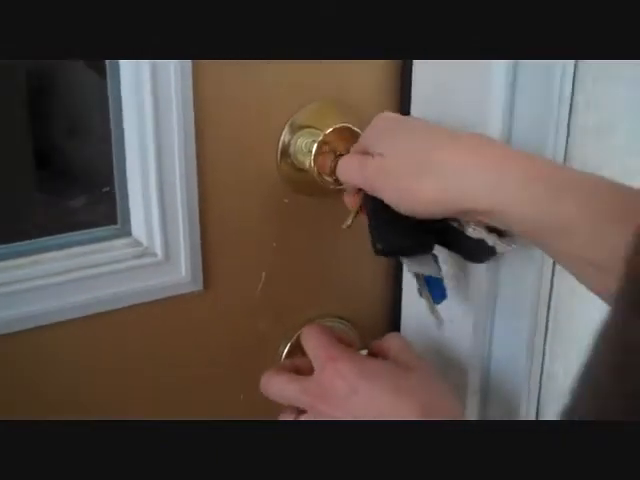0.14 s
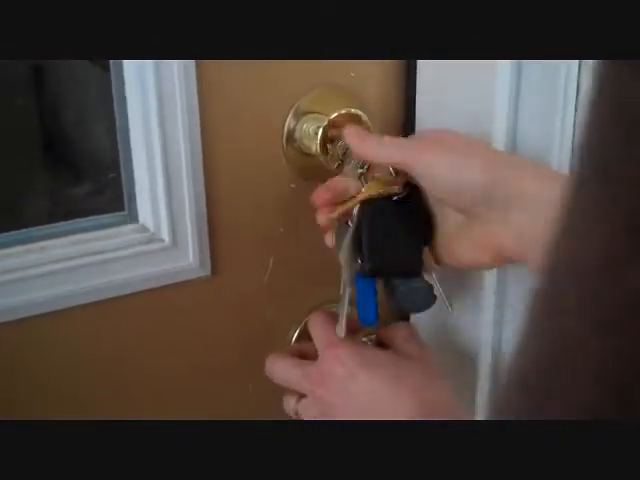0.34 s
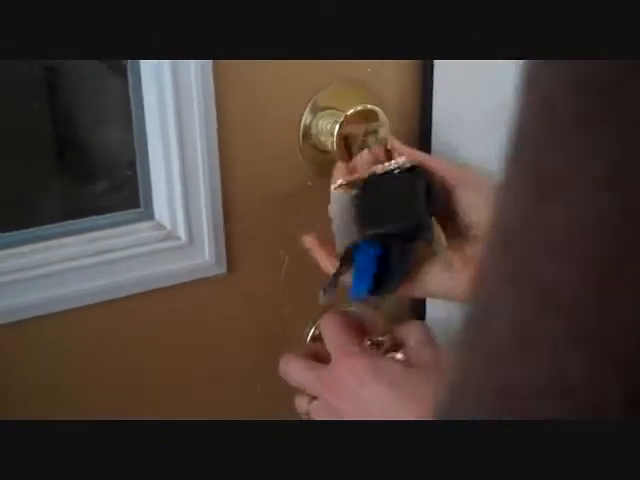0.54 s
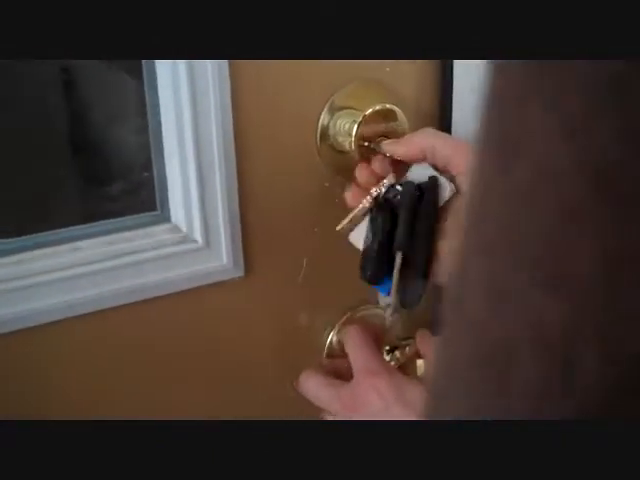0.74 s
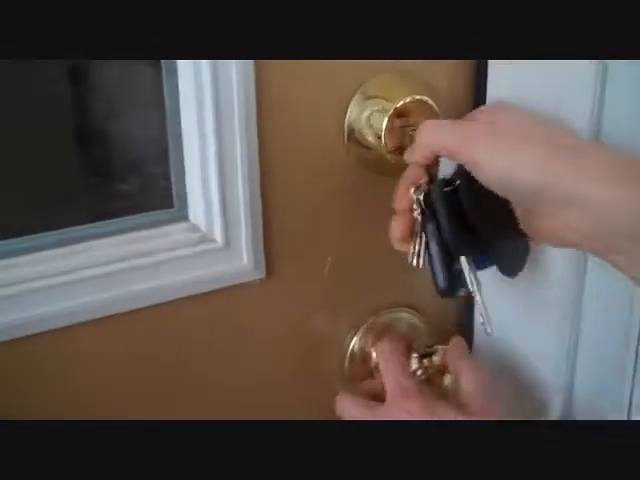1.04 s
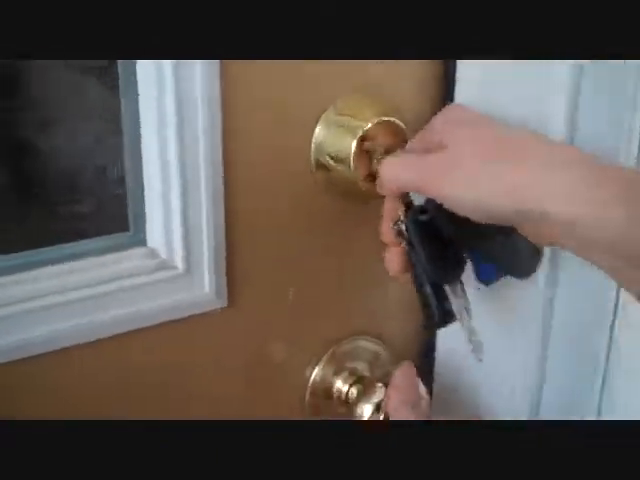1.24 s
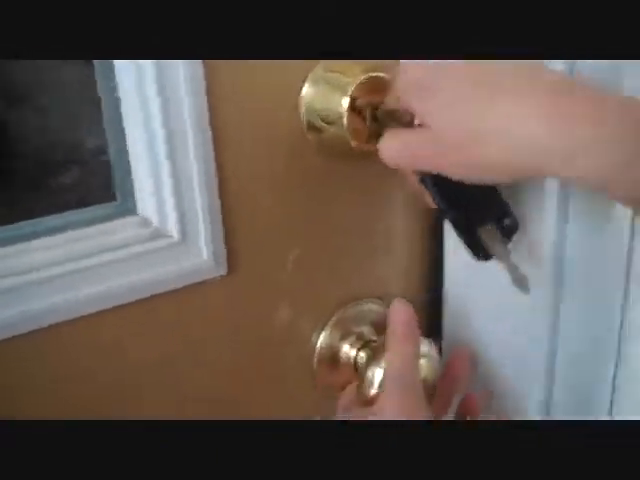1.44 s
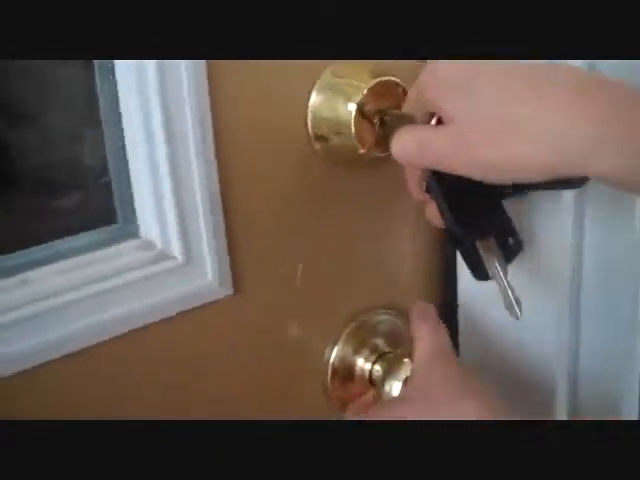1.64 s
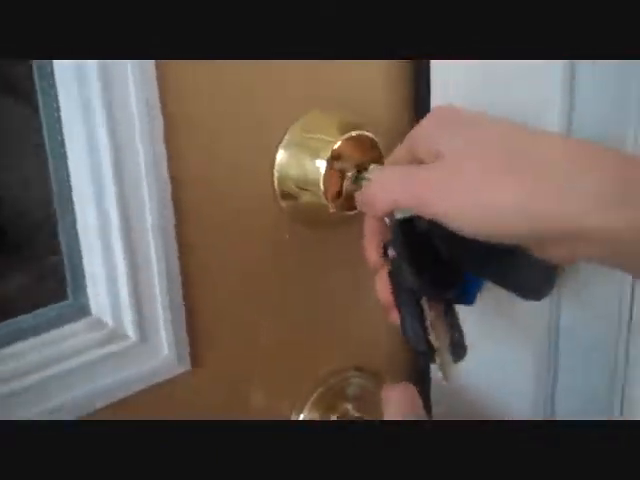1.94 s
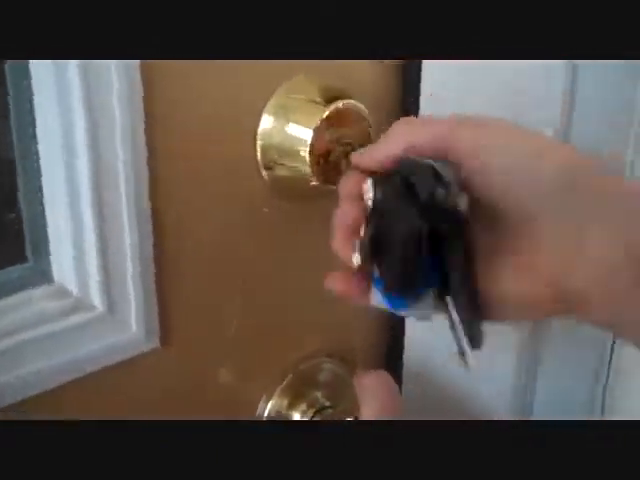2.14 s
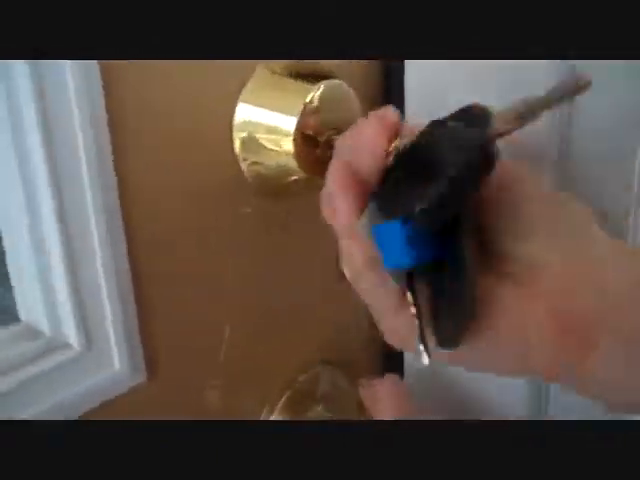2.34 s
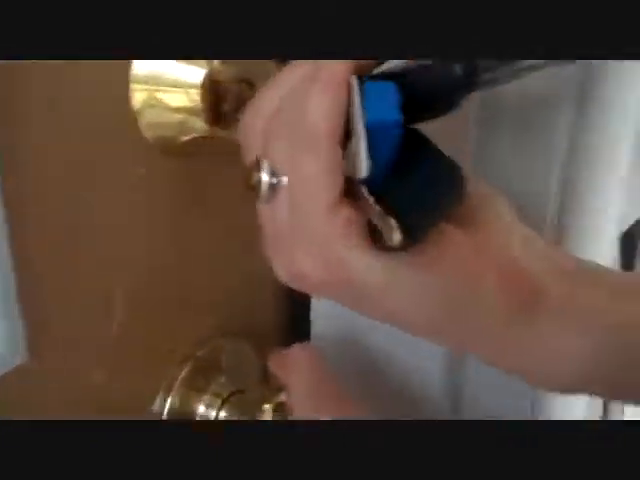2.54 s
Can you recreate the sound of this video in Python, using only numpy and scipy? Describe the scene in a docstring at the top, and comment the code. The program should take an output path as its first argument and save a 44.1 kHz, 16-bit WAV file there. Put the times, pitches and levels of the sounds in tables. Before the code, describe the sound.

Keys jingle and clatter as one turns in a deadbolt, the bolt knocking a wooden door

```python
"""Keys turning in a deadbolt

A bunch of keys and fobs clatters in gritty, ringing bursts as a key turns; the bolt shoots with a knock that rings
the wooden door. The key is drawn out and the bunch rustles in the hand, made of dense tiny clicks. Behind them are
a street drone of noise bands, two wavering engine hums and low wind noise. Two small microphone ports, each with
a sharp treble resonance of its own, overload on the hardest blows."""
import sys
import numpy as np
from scipy import signal
from scipy.io import wavfile

SR = 44100
rng = np.random.default_rng(int(sys.argv[2]) if len(sys.argv) > 2 else 0)


def ratio_of_db(decibels):
    """Turn decibels (scalar or array-like) into linear amplitude factors; 0 dB maps to 1."""
    return 10 ** (np.asarray(decibels, float) / 20)


def persist_wave(psi):
    """Save psi, clipped to +-1, as 16-bit WAV."""
    counts = np.round(np.clip(psi, -1, 1) * 32767).astype(np.int16)
    wavfile.write(sys.argv[1], SR, np.atleast_2d(counts).T)


N = 119070   # length in samples, 2.7 s


def rms_one(x):
    """Scale to unit rms."""
    return x / np.sqrt(np.mean(x ** 2) + 1e-20)


def in_time(rows):
    """Draw each column after the first as a line over the whole scene; the first holds the seconds."""
    s, *columns = np.transpose(rows)
    return [np.interp(np.arange(N) / SR, s, column) for column in columns]


def at_hz(points, hz):
    """Read a curve over pitch, on a log pitch axis."""
    point_hz, values = np.transpose(points)
    return np.interp(np.log(hz), np.log(point_hz), values)


def drift(rate_hz):
    """Slow random wander of unit rms: noise smoothed at one value per 40 samples, then joined by lines."""
    r = np.exp(-80 * np.pi * rate_hz / SR)
    slow = signal.lfilter([1], [1, -2 * r, r * r], rng.standard_normal(N // 40 + 2002))
    slow = slow[2000:]   # leave out the filter's start
    return np.interp(np.arange(N) / 40, np.arange(len(slow)), rms_one(slow))


def ring(clicks, hz, t60_s):
    """A unit click sets off a sine of starting height 1 that dies by 60 dB in t60_s."""
    r, w = ratio_of_db(-60 / (t60_s * SR)), 2 * np.pi * hz / SR
    return signal.lfilter([0, np.sin(w)], [1, -2 * r * np.cos(w), r * r], clicks + 1e-18)


def resonance(x, hz, width_hz):
    """Pass a narrow band, with unit gain at its top."""
    r = np.exp(-np.pi * width_hz / SR)
    feedback = [1, -2 * r * np.cos(2 * np.pi * hz / SR), r * r]
    return signal.lfilter([(1 - r * r) / 2, 0, (r * r - 1) / 2], feedback, x)


def band(x, low_hz, high_hz):
    """Keep what lies between two pitches."""
    return signal.sosfilt(signal.butter(2, [low_hz, high_hz], "band", fs=SR, output="sos"), x)


def grains(size, rate, spread_db):
    """Sparse clicks of uneven size and random sign, about rate of them per second."""
    sizes = ratio_of_db(spread_db * (np.minimum(rng.exponential(1, size), 4) - 1))
    sizes = sizes * rng.choice([-1, 1], size)
    return sizes * (rng.random(size) < rate / SR)


def traffic():
    """Far traffic: half-octave bands of noise, each wandering in level, less alike left and right in the treble."""
    # colour of the drone: pitch_hz, level_db (per Hz, relative)
    colour = [(25, -37), (80, 0.5), (230, -12.5), (420, -7.5), (830, -0.5), (1460, -10), (3200, -17.5),
              (7000, -27), (14000, -54)]
    # how alike the two sides are: pitch_hz, likeness (1 the same, 0 unrelated, -1 opposite)
    likeness = [(60, 0.95), (180, 1), (540, 1), (1640, 0.69), (4950, 0.41), (14900, -1.6)]
    # loudness of the whole drone: time_s, level_db (rms)
    loudness = [(0, -34.5), (.3, -38), (1.3, -36.5), (1.9, -36), (2.7, -38)]
    drone, edges = 0, 22 * 2 ** np.arange(0, 9.6, .5)
    white = rng.standard_normal((2, 2, N))
    for k, (low_hz, high_hz) in enumerate(zip(edges, edges[1:])):
        mid, side = band(white[k % 2], low_hz, high_hz)   # neighbouring bands use different noise
        hz = np.sqrt(low_hz * high_hz)
        alike = np.clip(at_hz(likeness, hz), -1, 1)
        both = np.sqrt(1 + alike) * mid + np.sqrt(1 - alike) * side * [[1], [-1]]
        drone = drone + ratio_of_db(at_hz(colour, hz) + 1.4 * drift(7.1)) * both
    return ratio_of_db(in_time(loudness)[0]) * rms_one(drone)


def engines():
    """Two engines hum as sines that waver in pitch and level: one idles, the other follows a curve."""
    # second engine: time_s, pitch_hz, level_db (sine height)
    second = [(0, 105, -60), (1.3, 125, -54), (2.0, 128, -47), (2.7, 137, -46)]
    idle_hz = 77 + 2.5 * drift(3.4)
    idle_rms = ratio_of_db(-48 + 2 * drift(2.7))
    idle = idle_rms * np.sqrt(2) * np.sin(2 * np.pi * np.cumsum(idle_hz) / SR)
    second_hz, second_db = in_time(second)
    second_height = ratio_of_db(second_db + 3 * drift(6))
    return idle + second_height * np.sin(2 * np.pi * np.cumsum(second_hz + 2 * drift(6)) / SR)


def wind():
    """Wind on the ports: separate low noise on each side, swelling along a curve with added uneven lumps."""
    # wind strength before the lumps: time_s, level_db (rms)
    strength = [(0, -59), (.22, -48), (.4, -55), (1.4, -57), (1.9, -41.5), (2.1, -40.5), (2.22, -36),
                (2.4, -44.5), (2.5, -45), (2.7, -42.5)]
    rumble = rms_one(band(rng.standard_normal((2, N)), 7.3, 165))
    lumps_db = 2.5 * np.array([drift(24), drift(2.8)])   # left, right
    return rumble * ratio_of_db(in_time(strength)[0] + lumps_db)


def doorway(x):
    """A short smear of reflections from door, frame and hands, different on each side."""
    echo_db, echo_t60_s = -11, .05
    t = np.arange(3000) / SR
    tails = grains(size=(2, 3000), rate=3000, spread_db=-10.0) * ratio_of_db(-60 * t / echo_t60_s)
    tails = tails * (t > .001)   # no reflection in the first millisecond
    tails = ratio_of_db(echo_db) * tails / np.sqrt(np.sum(tails ** 2, axis=1, keepdims=True))
    return x + signal.fftconvolve(x, tails, axes=1)[:, :N]


def rustle():
    """Fingers and keys rub together: dense uneven grains, partly shared by both ports."""
    # rubbing strength: time_s, level_db (relative)
    rubbing = [(0, -46), (.15, -47), (.24, -47.5), (.27, -59), (.32, -50), (.45, -39), (.58, -48),
               (.68, -38), (.78, -51.5), (.97, -47.5), (1.18, -46.5), (1.24, -50.5), (1.45, -43.5),
               (1.62, -45.5), (1.70, -41), (1.84, -43), (1.89, -33), (1.96, -35.5), (2.01, -28.5),
               (2.05, -33.5), (2.14, -42), (2.18, -34.5), (2.28, -30), (2.335, -36.5), (2.36, -29),
               (2.40, -35), (2.43, -29.5), (2.49, -39), (2.55, -40.5), (2.60, -38.5), (2.70, -34.5)]
    level_db, = in_time(rubbing)
    level_db = level_db + 4.5 + 2.2 * drift(60)   # overall lift and quick lumps
    g = grains(size=(3, N), rate=3000, spread_db=3.5)
    share = 0.48
    rub = share * g[2] + (1 - share) * g[:2]
    rub = signal.sosfilt(signal.butter(1, 1810, "high", fs=SR, output="sos"), rub)
    return ratio_of_db(level_db) * rms_one(rub)


def door():
    """Knocks through lock and knob, each a short rough shove, ring the panel's modes over a noisy thud."""
    # knocks: start_s, level_db (relative), pitch_hz near which the panel answers most
    knocks = [(0.191, -27.5, 550), (0.2, -25.5, 1500), (0.223, -27, 1320), (0.294, -24, 1450),
              (0.66, -28, 1400), (1.176, -25.5, 1920), (1.325, -25.5, 1440), (1.556, -21, 560),
              (1.56, -15, 576), (1.565, -14.5, 1460), (1.571, -17.5, 1180), (1.601, -30, 1960),
              (1.815, -28, 1200), (1.998, -30, 2400)]
    # ringing modes of the panel: pitch_hz, level_db (relative), t60_s (time to die by 60 dB)
    panel_modes = [(290, -10, 0.016), (444, -12, 0.051), (574, 2.5, 0.029), (850, -5.5, 0.011),
                   (1204, 1, 0.026), (1410, -0.5, 0.021), (1990, 0, 0.027), (2400, -3.5, 0.011)]
    knock_db, off_pitch_db_per_octave = -3, 3.5
    thud_db, thud_fade_s = -1.5, 0.014   # the thud falls to 1/e in its fade time
    s, db, near_hz = np.transpose(knocks)
    starts = (s * SR).astype(int)
    uneven_db = rng.normal(0, 0.64, (len(s), len(panel_modes)))
    shoves = rng.standard_normal((len(panel_modes), 600)) * np.exp(-np.arange(600) / SR / .003)
    ringing, clicks = 0, np.zeros(N)
    for k, (hz, mode_db, t60_s) in enumerate(panel_modes):
        off_pitch_db = off_pitch_db_per_octave * np.abs(np.log2(hz / near_hz))
        clicks[starts] = ratio_of_db(db + knock_db + mode_db + uneven_db[:, k] - off_pitch_db)
        pushes = signal.fftconvolve(clicks, shoves[k])[:N]
        one_knock = ring(shoves[k], hz, t60_s)
        ringing = ringing + ring(pushes, hz, t60_s) / np.abs(one_knock).max()
    clicks[starts] = ratio_of_db(db + knock_db + thud_db)
    fade = signal.lfilter([1], [1, -np.exp(-1 / (SR * thud_fade_s))], clicks)
    return ringing + band(rng.standard_normal(N) * fade, 380, 4000)


def keys():
    """Each blow is a gritty chatter of contacts that settles, ringing its own pitch and, faintly, the bunch's modes."""
    # keys, fobs and lock pins strike: start_s, level_db (relative), pitch_hz (strongest),
    # chatter_s (fade time of the chatter), ring_db (ring over grit)
    clinks = [(0.1952, -19, 5930, 0.0058, -11), (0.2005, -20.5, 5800, 0.011, -10),
              (0.2227, -10, 5650, 0.0062, -17), (0.2494, -17, 7100, 0.0032, 18),
              (0.2926, -13.5, 5640, 0.0037, 0.5), (0.3048, -17.5, 5340.0, 0.0021, 0),
              (0.342, -17, 5750, 0.0055, 9), (0.359, -26.5, 7060, 0.013, -2.5),
              (0.4084, -16.5, 6600, 0.0053, -35), (0.473, -15, 7300, 0.0081, -33),
              (0.486, -14, 7520, 0.0074, -21), (0.5, -22, 5960.0, 0.0053, 4),
              (0.5164, -17, 7700, 0.0019, -2), (0.5265, -9, 4650, 0.0017, 5),
              (0.531, -14.5, 6920, 0.0098, -2.5), (0.5448, 0.5, 5510, 0.00346, 46),
              (0.545, -3, 7020, 0.0034, 29), (0.6109, -15, 7840, 0.00166, 5.5),
              (0.6237, -11.5, 7100, 0.0045, -6.5), (0.633, -22, 7150, 0.003, 6.5),
              (0.652, -20, 7200, 0.0045, -14), (0.668, -7, 7600, 0.0022, -10.5),
              (0.671, -18, 5120, 0.0046, 4), (0.688, -7, 13310, 0.0022, 18.5),
              (0.7235, -21, 7350, 0.0022, -1), (0.743, -22.5, 7490, 0.011, -15),
              (0.7534, -19, 7340, 0.0068, 4), (0.8196, -21.5, 7900, 0.0045, -11.5),
              (0.852, -21, 7500, 0.0048, -19), (0.859, -15.5, 7440, 0.012, -4),
              (0.8653, -8, 7600, 0.0034, -2.5), (0.871, -14, 6130, 0.00267, 16),
              (0.8735, -16, 7430, 0.006, -5), (0.888, -27, 5530, 0.008, 16),
              (0.9876, -15.5, 7500, 0.0018, -15), (0.993, -21, 7400, 0.008, -20),
              (1.084, -19, 5210, 0.0013, -14), (1.1045, -21.5, 3860, 0.003, 6),
              (1.1665, -27, 7470.0, 0.011, -19), (1.194, -22.5, 5900, 0.0021, -22),
              (1.174, -25, 3000, 0.004, 0), (1.325, -12, 5510.0, 0.0024, -15),
              (1.381, -19.5, 5800, 0.0031, -7), (1.414, -5.5, 7270, 0.0029, 0.5),
              (1.4285, -4, 7060, 0.0049, -2), (1.433, -11, 3670, 0.012, -3),
              (1.44, -12.5, 7300, 0.0041, 14), (1.475, -7, 4500, 0.0032, -2),
              (1.509, -5.5, 4350, 0.00095, 2), (1.5286, -9, 4540, 0.0012, 2),
              (1.544, -12, 4700, 0.0018, -1), (1.551, -15, 6040, 0.012, -19), (1.56, -13, 5400, 0.008, -11),
              (1.5623, 6, 4500, 0.0021, -9.5), (1.569, -9.5, 3600, 0.0051, 16),
              (1.6, -14.5, 4900, 0.0028, 11), (1.746, -15, 6570, 0.006, -5),
              (1.816, -13.5, 5950, 0.01, -35), (1.999, -6, 4860, 0.0018, -2.5),
              (2.342, -6, 5100, 0.00098, -3), (2.353, -18.5, 6480, 0.018, -1),
              (2.5146, -20, 8200, 0.0044, -20)]
    # ringing modes of the bunch: pitch_hz, level_db (relative), t60_s (time to die by 60 dB)
    bunch_modes = [(4380, 6, 0.044), (5510, -0.5, 0.063), (6400, -13, 0.05)]
    # the bunch swings across: time_s, balance_db (left minus right)
    swing = [(0, -5), (.35, 4.5), (.9, 4), (1.2, -4.5), (2.7, 4)]
    rise_s, settle_s, settle_db = 0.000246, 0.01, -18.5
    clink_db, modes_db, first_touch_db = -11, -21, 14
    share = 0.52   # part of the grit that both ports hear alike
    own_ring_t60_s, ring_per_chatter = 0.0041, 1.3   # longer chatter rings longer
    left_lag_s = 6.5e-5   # the keys reach the left port later
    out, t = np.zeros((2, N + 3000)), np.arange(3000) / SR
    for s, db, hz, chatter_s, ring_db in clinks:
        fade = np.exp(-(t / chatter_s) ** 2) + ratio_of_db(settle_db) * np.exp(-t / settle_s)
        shape = np.minimum(t / rise_s, 1) * fade
        g = grains(size=(3, 3000), rate=10000, spread_db=5) * shape
        g[2, int(rise_s * SR)] = ratio_of_db(first_touch_db)
        touch = share * g[2] + (1 - share) * g[:2]
        grit = rms_one(band(touch, 2420, 15300))
        own_ring = rms_one(ring(touch, hz, own_ring_t60_s + ring_per_chatter * chatter_s))
        modes = 0
        for mode_hz, mode_db, t60_s in bunch_modes:
            uneven_db = 0.88 * rng.standard_normal()
            modes = modes + ratio_of_db(mode_db + uneven_db) * ring(touch, mode_hz, t60_s)
        blow = grit + ratio_of_db(ring_db) * own_ring + ratio_of_db(modes_db) * rms_one(modes)
        i = int(s * SR)
        out[:, i:i + 3000] += ratio_of_db(db + clink_db) * rms_one(blow) * np.sqrt(np.mean(shape ** 2))
    left, right = out[:, :N] * ratio_of_db(in_time(swing)[0] * [[.5], [-.5]])
    left = np.pad(left, (round(left_lag_s * SR), 0))[:N]
    return np.array([left, right])


def scene():
    """Keys and door close by with their reflections, the rustle, and the street behind."""
    return doorway(keys() + door()) + rustle() + traffic() + engines() + wind()


def band_limit(x):
    """A steep low-pass at the top of the band."""
    return signal.sosfilt(signal.butter(12, 15510, fs=SR, output="sos"), x)


def record(dry):
    """Each port lifts its own treble band and rolls off above; the top is cut, then hard blows clip."""
    # left and right port: pitch_hz and width_hz of the resonance, lift_db (resonance added to the plain sound),
    # roll_off_hz, gain_db
    ports = [(7293, 960, 14, 11700, -1), (5900, 870, 11.5, 6800, 0.85)]
    heard = []
    for x, (hz, width_hz, lift_db, roll_off_hz, gain_db) in zip(dry, ports):
        lifted = x + ratio_of_db(lift_db) * resonance(x, hz, width_hz)
        roll_off = signal.butter(3, roll_off_hz, fs=SR, output="sos")
        heard.append(ratio_of_db(gain_db) * signal.sosfilt(roll_off, lifted))
    top_cut = signal.ellip(10, .5, 45, 14250, fs=SR, output="sos")   # steep, at 14250 Hz
    mix = np.clip(signal.sosfilt(top_cut, np.array(heard)), -1, 1)
    return band_limit(mix)


dry = scene()
out = record(dry)
persist_wave(out)
```